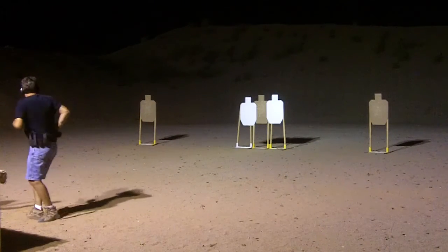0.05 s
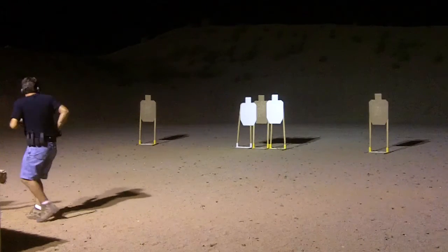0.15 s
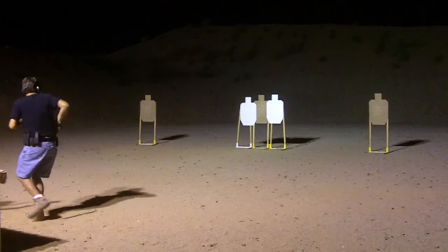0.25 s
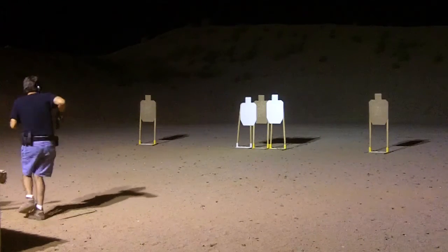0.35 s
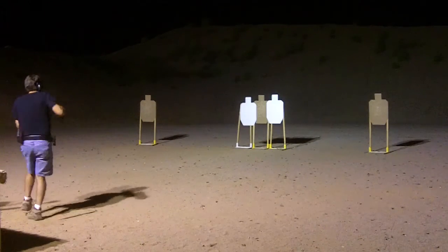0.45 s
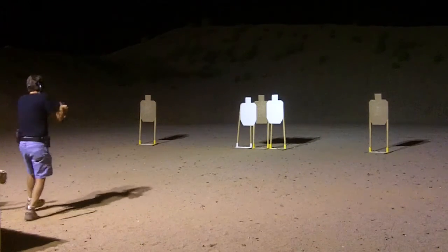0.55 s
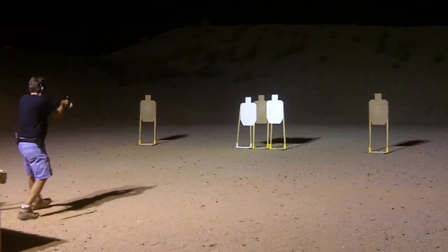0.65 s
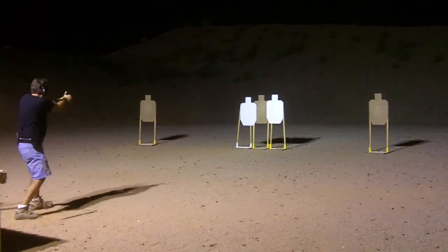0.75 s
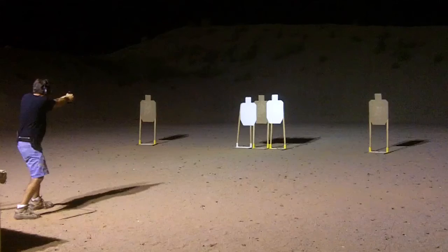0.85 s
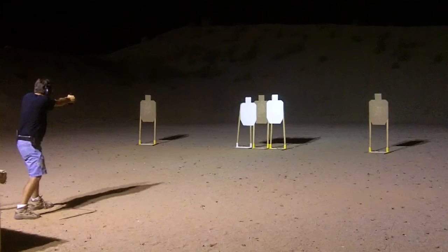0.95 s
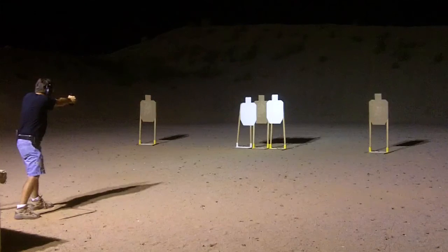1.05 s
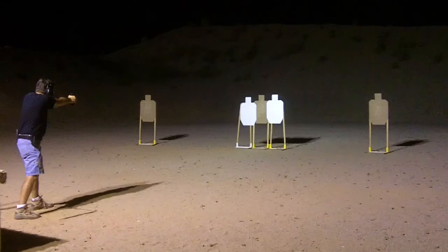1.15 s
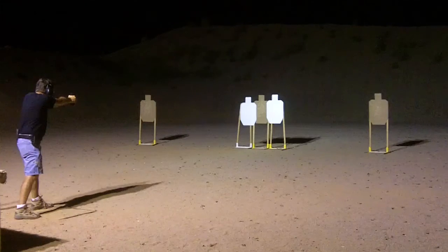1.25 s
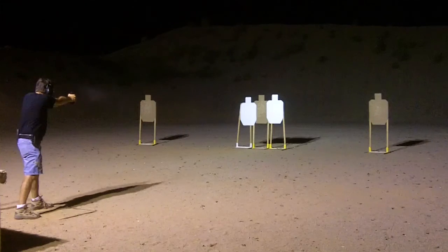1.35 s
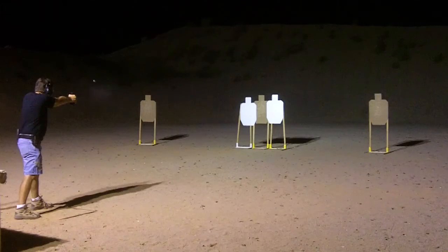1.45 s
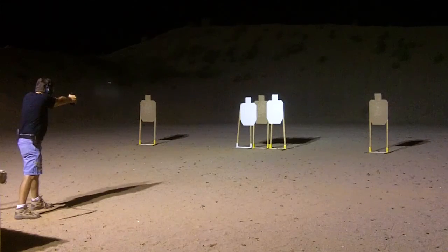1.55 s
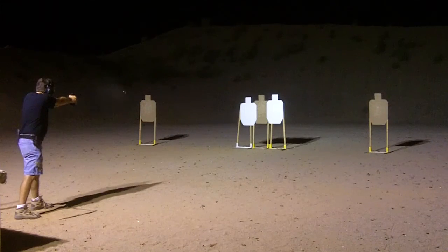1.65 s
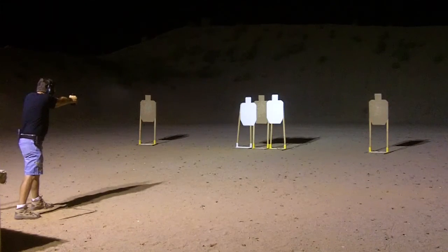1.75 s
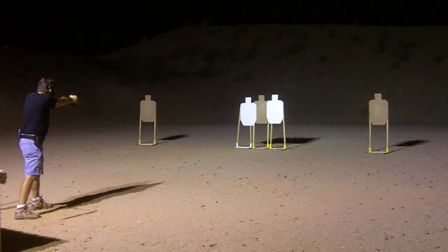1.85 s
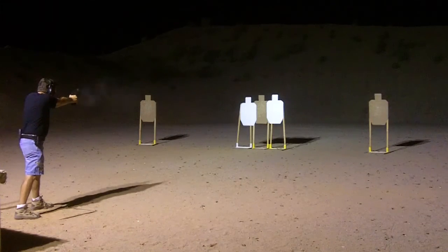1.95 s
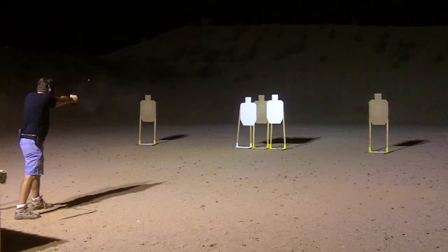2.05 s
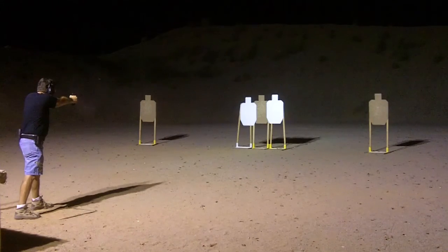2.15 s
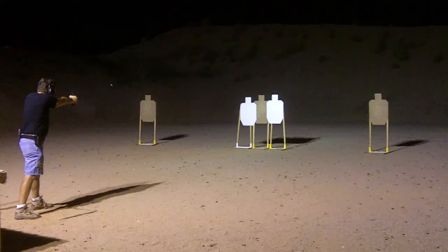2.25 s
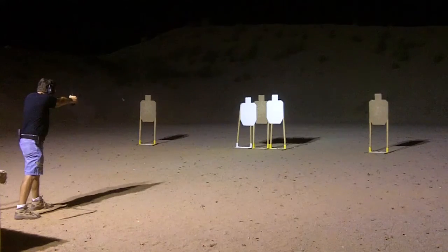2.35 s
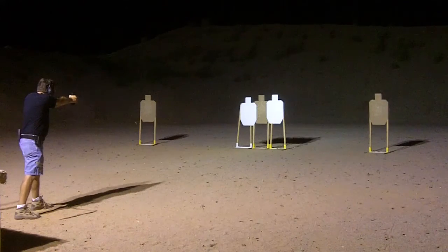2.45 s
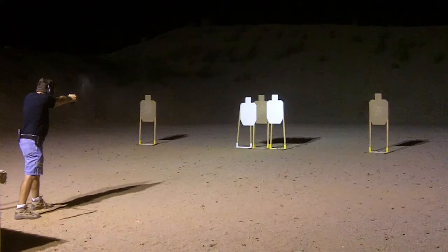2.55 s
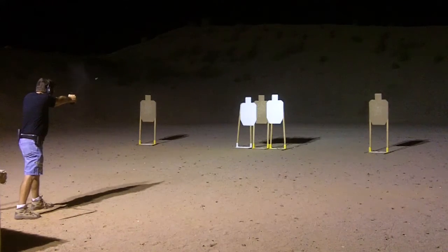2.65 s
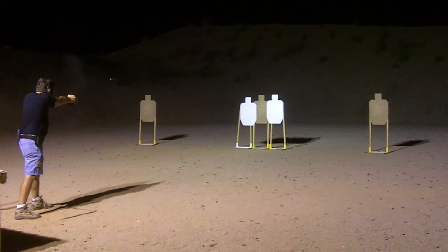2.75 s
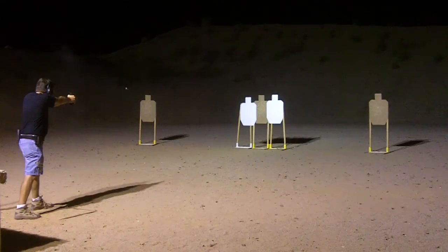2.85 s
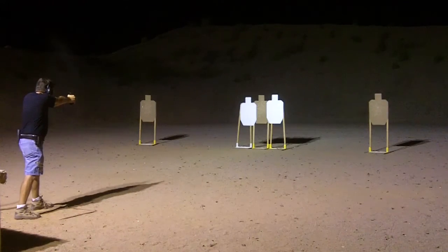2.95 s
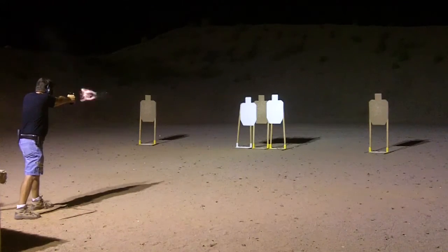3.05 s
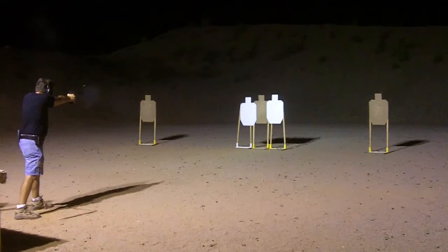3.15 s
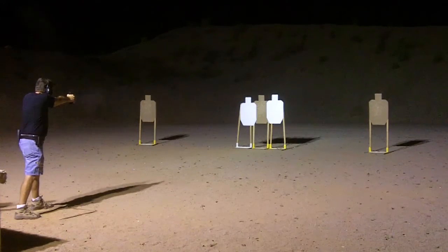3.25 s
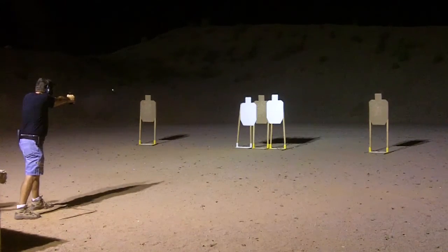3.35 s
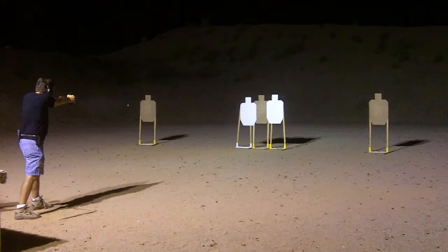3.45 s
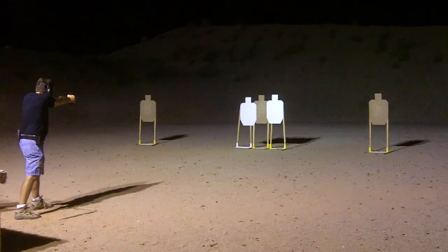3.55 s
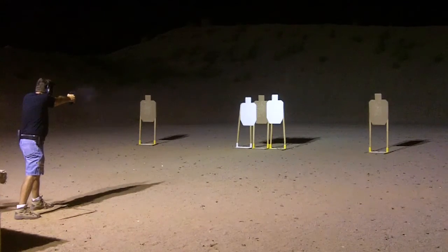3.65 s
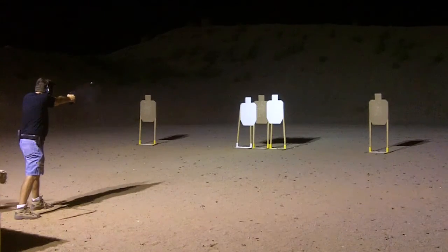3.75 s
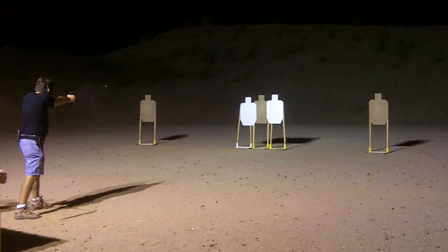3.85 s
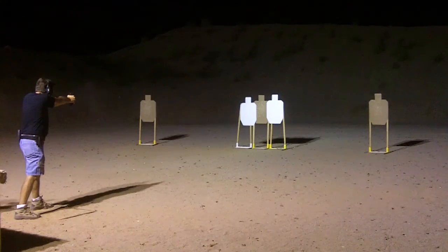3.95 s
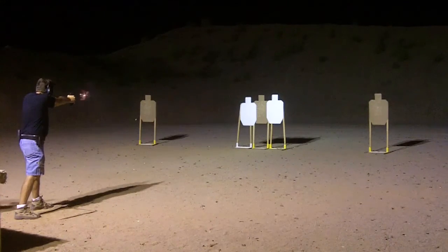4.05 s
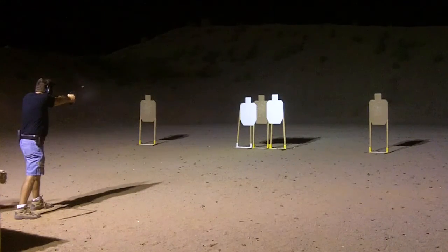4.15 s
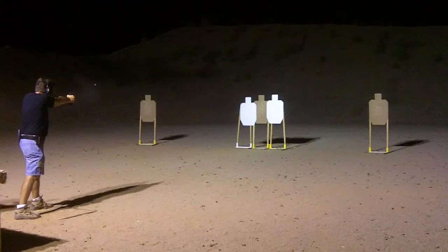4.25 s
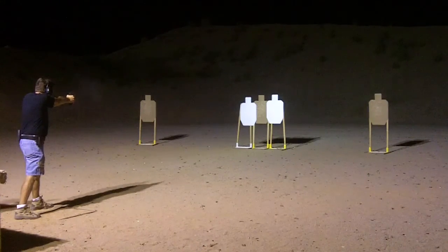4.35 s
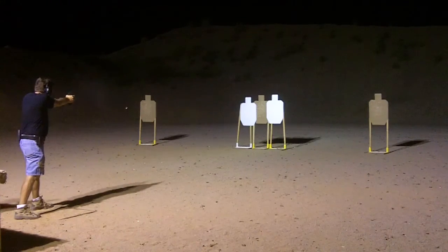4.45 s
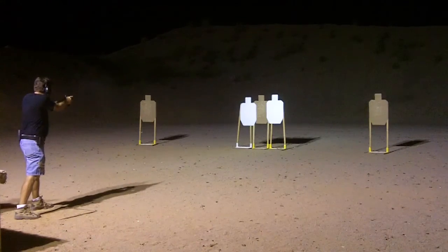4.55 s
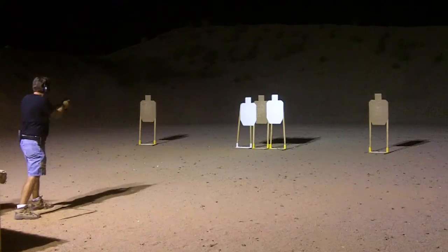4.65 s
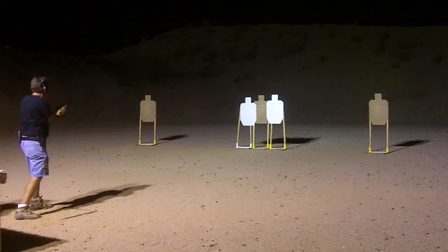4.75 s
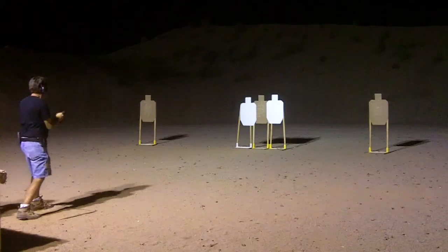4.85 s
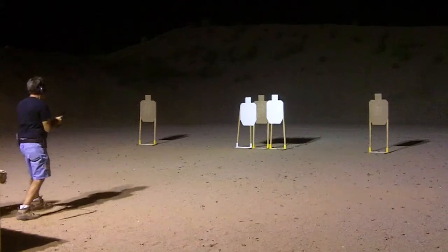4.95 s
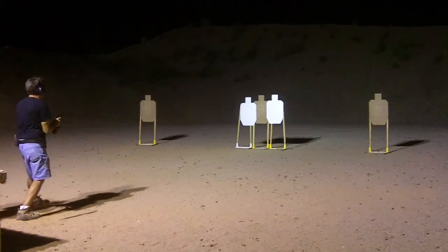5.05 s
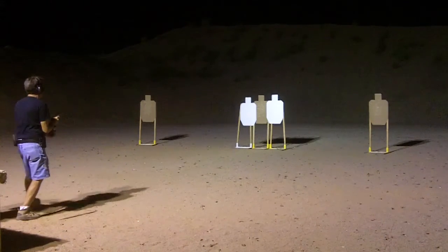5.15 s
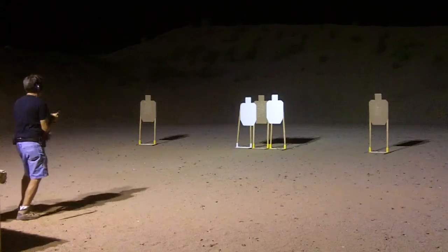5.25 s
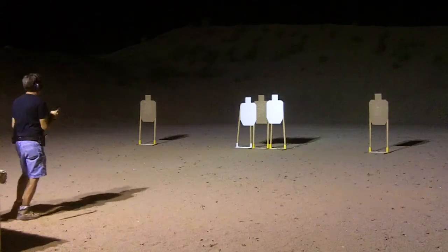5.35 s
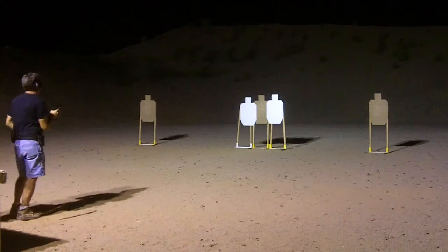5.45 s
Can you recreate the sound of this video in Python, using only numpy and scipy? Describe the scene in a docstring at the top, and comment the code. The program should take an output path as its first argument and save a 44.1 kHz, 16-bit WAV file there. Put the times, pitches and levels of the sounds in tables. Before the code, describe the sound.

At an outdoor shooting range, wind rumbles, thumps and lightly crackles on the microphone for the first 1.3 seconds, with faint gritty scuffs of shoes on dirt underneath. The wind then drops to a low rumble as a pistol fires six loud, sharp shots a few metres away, at about 1.4, 2.0, 2.6, 3.2, 3.7 and 4.2 seconds. Each blast briefly overloads the microphone and is followed by a quick slap from a wall and a short, rough echo off earth banks. At about 4.5 seconds a faint ricochet whines, falling in pitch, peaking near 4.7 seconds and fading away. Soft shoe scuffs return from about 4.9 seconds, and the wind picks up again, with several low thumps and small crackles from 5 seconds to the end at around 5.6 seconds.

```python
"""An outdoor shooting range at night: six pistol shots overload a microphone a few metres away.
Each blast bounces back from the ground, a side wall and the earth banks. The last bullet ricochets
and tumbles away with a falling whine. Wind rumbles, thumps and crackles on the microphone, and the
shooter's shoes scuff the dirt before and after the shots."""
import sys
import numpy as np
from scipy.fft import rfft, irfft, next_fast_len
from scipy.io import wavfile
from scipy.ndimage import map_coordinates

SR = 44100
rng = np.random.default_rng(int(sys.argv[2]) if len(sys.argv) > 2 else 0)


def dump(signal):
    """Clip the signal to [-1, 1] and save it as 16-bit WAV at the path in sys.argv[1]."""
    limited = np.clip(np.atleast_2d(signal).T, -1, 1)
    pcm = np.round(limited * 32767).astype(np.int16)
    wavfile.write(sys.argv[1], SR, pcm)


N = 242991
TIME = np.arange(N) / SR
AGE = np.arange(SR * 3 // 2) / SR  # seconds since one event began

# Large swirls of wind that hit the microphone: (time [s], signed strength [gain], width [s])
BIG_SWIRLS = [(.046, 0.58, .006), (.099, .4, .0013), (.138, .35, .0015), (.185, -.3, .0028),
              (.405, .32, .004), (.467, 0.4, 0.0086), (.5157, 0.48, .0011), (0.5345, .53, .00027),
              (.598, -.5, .0022), (.62, .27, .00063), (0.7405, -.55, .0013), (0.7934, .3, 0.00097),
              (.864, .52, .0018), (1.294, -0.65, .0012), (1.309, -0.39, 0.0013), (1.853, .09, .0011),
              (5.042, -.6, .0035), (5.065, .55, .006), (5.231, 0.69, .0008), (5.3425, .3, .0007)]
# Tone of sound scattered by rough surfaces: (frequency [Hz], relative level [dB])
ECHO_TONE = [(60, -14.5), (200, -2.5), (320, -3), (600, 1.5), (1000, 1), (1700, 0.5), (2700, -5),
             (4200, -10.5), (6500, -17.5), (9000, -28), (12000, -31), (15000, -37)]


def amp(db):
    """Turn decibels into a gain."""
    return 10 ** (np.asarray(db) / 20)


def unit(x):
    """Scale a signal to an average (rms) level of 1."""
    return x / np.sqrt(np.mean(x ** 2) + 1e-20)


def gains(tone, hz):
    """Read the gain at each frequency from a table of (frequency [Hz], level [dB])."""
    table_hz, db = np.transpose(tone)
    return amp(np.interp(np.log(hz + 1), np.log(table_hz + 1), db))


def wobble(per_s):
    """A smooth random curve through per_s new values a second."""
    return map_coordinates(rng.standard_normal(int(N * per_s / SR) + 4), [TIME * per_s])


def colour(x, gain):
    """Filter by gain(hz) so that any ringing comes after a sound, never before it."""
    size = 2 * next_fast_len(len(x) // 2 + 4096)
    hz = np.fft.rfftfreq(size, 1 / SR)
    cepstrum = irfft(np.log(np.maximum(gain(hz), 1e-6)))
    cepstrum[1:size // 2] *= 2  # fold the early half of the response onto the late half
    cepstrum[size // 2 + 1:] = 0
    return irfft(rfft(x, size) * np.exp(rfft(cepstrum)))[:len(x)]


def dull(x, top_hz, order):
    """Fade the treble above top_hz; a higher order cuts more steeply."""
    size = next_fast_len(len(x) + 1024)
    hz = np.fft.rfftfreq(size, 1 / SR)
    return irfft(rfft(x, size) / np.sqrt(1 + (hz / top_hz) ** order), size)[:len(x)]


def noise(tone, size):
    """Noise with the given tone, at an average level of 1."""
    return unit(colour(rng.standard_normal(size), lambda hz: gains(tone, hz)))


def add(track, start_s, x):
    """Mix x into the track at a time; what falls outside is dropped."""
    start = round(start_s * SR)
    x = x[max(-start, 0):]
    part = track[max(start, 0):][:len(x)]
    part += x[:len(part)]


def crack(tone, length_s):
    """A short, ragged burst of shocks, with the energy of a level of 1 held for length_s."""
    arch = np.sqrt(np.abs(np.sin(np.pi * np.minimum(AGE[:2048] / length_s, 1))))
    burst = rng.standard_normal(len(arch)) * arch
    for _ in range(4):  # even out the frequencies while keeping the burst short
        burst = arch * irfft(np.exp(1j * np.angle(rfft(burst))))
    burst = colour(burst, lambda hz: gains(tone, hz))
    return burst * np.sqrt(length_s * SR / np.sum(burst ** 2))


def night_air():
    """The faint, steady hush of the open air."""
    # Tone of the hush: (frequency [Hz], relative level [dB])
    air_tone = [(150, -11), (400, 4), (800, -2), (1600, -9.5), (3000, -16.5), (5000, -27.5), (8000, -39.5),
                (14000, -49)]
    return amp(-60.5) * noise(air_tone, N)


def shoe_scuffs():
    """Soles rub over dirt; single grains and larger clumps make the hiss gritty."""
    # Shoe movements: (start [s], length [s], level [dB])
    scuffs = [(.295, 0.11, -52.5), (0.51, 0.49, -57.5), (1.172, 0.18, -60), (4.85, .4, -60),
              (5.027, 0.093, -55.5), (5.422, 0.21, -54.5)]
    # Tone of the dirt: (frequency [Hz], relative level [dB])
    grit_tone = [(300, 2), (1700, -1), (4500, -12), (8000, -28), (14000, -43.5)]
    hiss = noise(grit_tone, N)
    grains_db, clumps_db = 5 * wobble(per_s=260), 5 * wobble(per_s=45)
    grit = unit(hiss * amp(grains_db + clumps_db))
    out = np.zeros(N)
    for start, length, db in scuffs:
        out += amp(db) * grit * np.sin(np.pi * np.clip((TIME - start) / length, 0, 1))
    return out


def swirl(t, width_s):
    """One swirl of air: a sharp core of pressure inside a wider, opposite swing."""
    u = t / width_s
    return 1 / (1 + u * u) - 4 / (16 + u * u)


def wind():
    """Wind on the microphone: a low rumble, small swirls that grow with it, and big ones that thump."""
    # Strength of the wind: (time [s], relative level [dB])
    strength = [(0.0, -20.5), (0.14, -28), (0.67, -24), (1.3, -32), (1.59, -43.5), (2.1, -38), (3.51, -52),
                (4.57, -41.5), (5.13, -25.5), (5.5, -28.5)]
    # Tone of the rumble: (frequency [Hz], relative level [dB])
    rumble_tone = [(8, -6.5), (20, 10), (45, -2.5), (75, -8), (130, -25.5), (220, -29.5), (400, -47),
                   (800, -70.5), (1600, -100)]
    swirls_per_s, typical_width_s = 60, .0024
    times, db = np.transpose(strength)
    level = amp(np.interp(TIME, times, db))
    rumble = unit(noise(rumble_tone, N) * amp(2.5 * wobble(per_s=12)))  # quick gusts
    flutter, t = np.zeros(N), AGE[:SR // 4] - 1 / 8
    small_swirls = rng.standard_normal((int(swirls_per_s * N / SR), 3))
    for slot, (shift, size, spread) in enumerate(small_swirls):
        puff = size * swirl(t, typical_width_s * np.exp(.43 * spread)) * np.hanning(len(t))
        add(flutter, (slot + shift) / swirls_per_s + t[0], puff)
    buffeting = level * (amp(6) * rumble + amp(-1.5) * unit(flutter))
    thumps = sum(pressure * swirl(TIME - when, width) for when, pressure, width in BIG_SWIRLS)
    return dull(buffeting + thumps, top_hz=560, order=6)


def wind_crackle():
    """The microphone ticks while a big swirl presses on it: up to three ticks for a wide swirl."""
    # Tone of a tick: (frequency [Hz], relative level [dB])
    tick_tone = [(300, 1.5), (1200, -3), (4000, -19.5), (9000, -37.5)]
    gap_s, width_per_tick_s = .0056, .0027
    out = np.zeros(N)
    for when, pressure, width in BIG_SWIRLS:
        for k in range(3):
            strength = pressure * np.clip(width / width_per_tick_s - k, 0, 1)
            add(out, when - width / 2 + k * gap_s, strength * crack(tick_tone, length_s=.0007))
    return amp(-29.5) * out


def ricochet():
    """A tumbling bullet sings lower as it slows, and is loudest where it passes nearest."""
    # Tones in the whine: (multiple of the pitch [ratio], relative level [dB])
    whine_parts = [(.8, -10), (1, 0), (1.2, -18), (2, -23)]
    start_s, rise_s, flutter_db = 4.5, .08, 3
    start_hz, end_hz, slowing_s = 2015, 1140, .84
    nearest_s, passing_s = 4.71, .1
    flight = np.maximum(TIME - start_s, 0)
    hz = end_hz + (start_hz - end_hz) * np.exp(-flight / slowing_s)
    phase = 2 * np.pi * np.cumsum(hz * (1 + .00523 * wobble(per_s=49))) / SR
    whine = sum(amp(db + flutter_db * wobble(per_s=22)) * np.sin(k * phase) for k, db in whine_parts)
    distance = np.hypot(1, (TIME - nearest_s) / passing_s)  # 1 at the nearest point
    fade_in = 1 - np.exp(-flight / rise_s)
    return amp(-58.5) * unit(whine) / distance * fade_in


def bank_echoes(terrain):
    """Rough earth banks echo in clumps: early ones repeat from shot to shot, later ones vary and blend."""
    # Echo clumps: (delay [s], level [dB], rise [s], time to fade by 60 dB [s], dull above [Hz])
    clumps = [(.003, -16, 0.00033, .19, 6000), (.043, -16.5, 0.0018, 0.2, 5025),
              (.08, -28, 0.013, 0.59, 3510), (.125, -33, 0.0025, 0.24, 8000),
              (.2, -46.5, 0.051, 0.88, 2504)]
    alike_s, rough_db = .09, 2.5
    shared = np.exp(-AGE / alike_s)
    scatter = np.sqrt(shared) * terrain + np.sqrt(1 - shared) * noise(ECHO_TONE, len(AGE))
    out = np.zeros(len(AGE))
    for delay, db, rise, fade, top_hz in clumps:
        t = np.maximum(AGE - delay, 0)
        echo = np.roll(dull(scatter, top_hz, order=4), -round(delay * SR))
        out += echo * amp(db - 60 * t / fade) * (1 - np.exp(-t / rise))
    return out * amp(rough_db * np.sqrt(shared) * wobble(per_s=280)[:len(AGE)])


def far_echoes():
    """Single echoes from far away; air and rough ground take away their treble."""
    # Far echoes: (delay [s], level before dulling [dB], length [s], dull above [Hz])
    echoes = [(0.13, -35.5, .006, 9000), (.19, -35, 0.0083, 2200), (.203, -33.5, .007, 2600),
              (.276, -32, .005, 850), (0.287, -31.5, 0.0051, 860)]
    out = np.zeros(len(AGE))
    for delay, db, length, top_hz in echoes:
        echo = colour(crack(ECHO_TONE, length), lambda hz: 1 / (1 + (hz / top_hz) ** 4))
        add(out, delay, amp(db) * echo)
    return out


def near_bounce(hz, cycles):
    """A nearby surface sends back a short, dull swing of pressure with a faint crack."""
    arch = np.sin(np.pi * np.minimum(AGE * hz / cycles, 1))
    out = -amp(-7) * np.sin(2 * np.pi * hz * AGE) * arch
    add(out, 0, amp(-30) * crack(ECHO_TONE, length_s=.0025))
    return out


def overload_swing(rise_s, fall_s):
    """An overloaded microphone is thrown off centre and swings slowly back."""
    return (1 - np.exp(-AGE / rise_s)) * (1 - AGE / fall_s) * np.exp(-AGE / fall_s)


def pistol():
    """Each shot is a sharp blast from the muzzle, then its echoes; blast and wall echo jolt the microphone."""
    # Shots: (time [s], level [dB], extra bite near 4 kHz [dB], swing after the wall echo [gain])
    shots = [(1.3898, -4.5, 2.5, 0.049), (2.0206, -5, 0.5, .42), (2.5763, -5.5, 0.5, -0.077),
             (3.1585, -4.5, 6.5, .18), (3.6934, -5, 3, -0.29), (4.1656, -4.5, -1.5, 0.26)]
    # Tone of the blast: (frequency [Hz], relative level [dB])
    blast_tone = [(100, -8), (300, 7.5), (620, -3), (800, -3.5), (1100, -1.5), (1800, -5.5), (2600, -2),
                  (4200, -8), (6300, -14), (8500, -27.5), (11000, -23), (15000, -20)]
    # Tone of the wall echo: (frequency [Hz], relative level [dB])
    wall_tone = [(100, -0.5), (400, -3), (800, -5.5), (1100, -9.5), (1700, 4.5), (2600, -8.5),
                 (4200, -14.5), (6300, -22.5), (8500, -35), (15000, -26)]
    ground_s, bounce_s, wall_s, far_wall_s = .0017, .0086, .0422, .0808  # echo delays
    out, terrain = np.zeros(N), noise(ECHO_TONE, len(AGE))
    for when, db, bite_db, wall_swing in shots:
        bite = lambda hz: amp(bite_db / (1 + ((hz - 4050) / 350) ** 2))
        blast = amp(db) * colour(crack(blast_tone, length_s=.0019), bite)
        add(out, when, blast)
        # The ground echo follows so closely that it cancels some frequencies.
        add(out, when + ground_s * (1 + .08 * rng.standard_normal()), amp(-4) * blast)
        add(out, when + bounce_s, near_bounce(hz=685, cycles=2.4))
        slap = amp(db + 3) * crack(wall_tone, length_s=.00072)
        add(out, when + wall_s, slap)
        # The longer path meets the ground at a flatter angle, so its ground echo lags less.
        add(out, when + wall_s + ground_s / 2, amp(-5.5) * slap)
        add(out, when + far_wall_s, amp(-8) * dull(slap, top_hz=4000, order=4))
        add(out, when, far_echoes())
        add(out, when, bank_echoes(terrain))
        add(out, when + ground_s, .13 * overload_swing(rise_s=.0026, fall_s=.072))
        add(out, when + wall_s, wall_swing * overload_swing(rise_s=.00084, fall_s=.026))
    return out


def scene():
    """Everything reaches one microphone, heard alike in both ears."""
    mono = pistol() + ricochet() + night_air() + shoe_scuffs() + wind_crackle() + wind()
    return np.array([mono, mono])


def record(dry):
    """The microphone's opening weakens narrow bands, loud peaks flatten, and the top treble is lost."""
    # Dips caused by the opening: (frequency [Hz], half width [Hz], depth [0-1])
    dips = [(3480, 330, 0.37), (5420, 420, 0.9), (10000, 200, 0)]
    ceiling, top_hz = 1.02, 15500

    def opening(hz):
        each_dip = [1 - depth / (1 + ((hz - centre) / width) ** 2) for centre, width, depth in dips]
        return np.prod(each_dip, axis=0)

    filtered = np.array([colour(channel, opening) for channel in dry])
    flattened = filtered / (1 + np.abs(filtered / ceiling) ** 8) ** (1 / 8)
    hz = np.fft.rfftfreq(N, 1 / SR)
    return irfft(rfft(flattened) / (1 + (hz / top_hz) ** 90), N)


dry = scene()
out = record(dry)
dump(out)
```